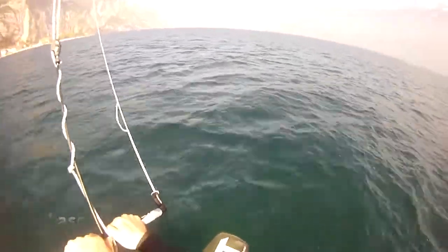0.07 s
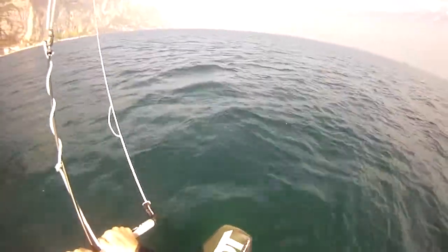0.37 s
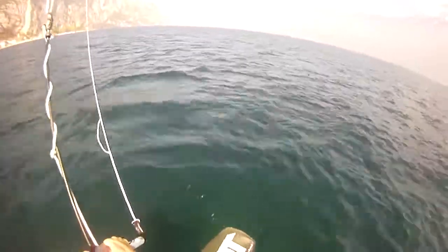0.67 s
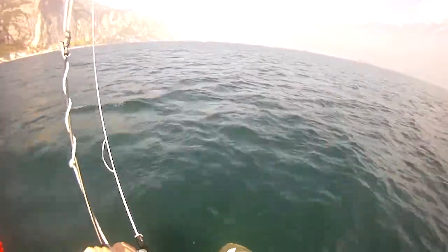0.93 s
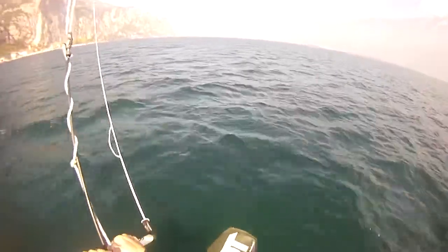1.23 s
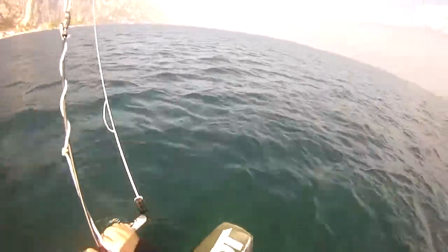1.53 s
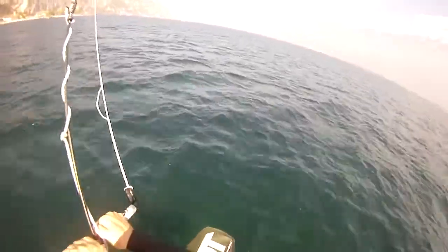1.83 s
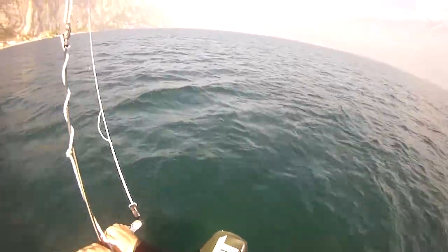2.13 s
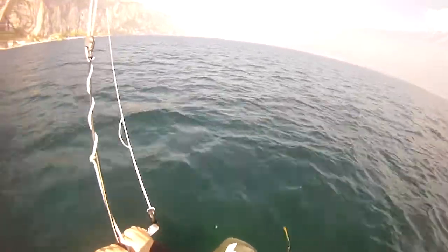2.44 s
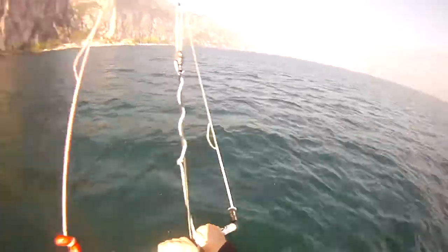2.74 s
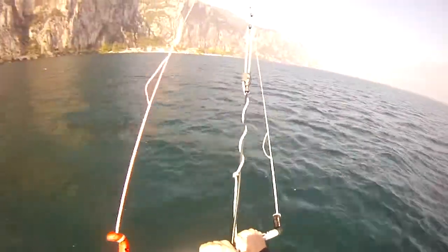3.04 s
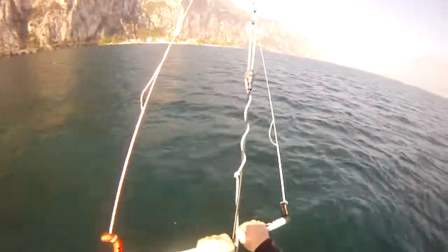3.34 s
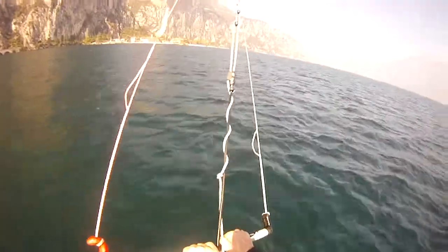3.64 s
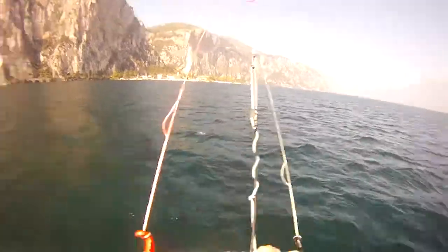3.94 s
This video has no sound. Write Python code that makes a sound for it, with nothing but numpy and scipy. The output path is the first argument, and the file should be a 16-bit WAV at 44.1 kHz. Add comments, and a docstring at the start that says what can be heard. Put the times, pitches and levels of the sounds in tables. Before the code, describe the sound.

A hollow, slightly glassy wind streams past a microphone out on a lake, carrying a thin unsteady whistle and light ticks. The wind suddenly eases and the whistle ends, while soft low buffets and muffled water continue.

```python
"""Kite camera over a lake

Wind streams past a small cased camera under a kite, ringing the hollows of the case and buffeting it.
A thin whistle, probably from an edge or a line, wavers until the camera swings round and the rush drops.
Faint ticks hit the case, water washes dully below, and something rustles briefly at the end.
The camera's low sample rate adds a glassy sheen."""
import sys
import numpy as np
from scipy import signal
from scipy.fft import rfft, irfft
from scipy.io import wavfile
from scipy.ndimage import map_coordinates

SR = 44100
rng = np.random.default_rng(int(sys.argv[2]) if len(sys.argv) > 2 else 0)


def unload_wav(signal):
    """Save mono or channel-first audio to the path in sys.argv[1] as 16-bit WAV at rate SR, clipped to [-1, 1]."""
    wavfile.write(
        sys.argv[1],
        SR,
        np.round(np.clip(np.atleast_2d(signal).T, -1, 1) * 32767).astype(np.int16),
    )


N = 176400

# Resonant hollows of the case: f/Hz, width/Hz, relative level facing the wind/dB, turned away/dB
HOLLOWS = [(568, 184, -17, -19.5), (1136, 315, -10.5, -6.5), (1644, 740, -13.5, -9),
           (1972, 267, -6.5, -3.5), (2140, 210, -0.46, -2), (2970, 150, -23.5, -28),
           (3555, 330, -23.5, -17.5)]


def rush():
    """Fluttering, eddying air rings the hollows; their balance shifts as the camera turns."""
    # Air flow over the case: t/s, level/dB
    flow = [(0, -45.3), (.17, -42), (.45, -43.7), (.63, -42.3), (.88, -44), (1, -43.5), (1.5, -44.4),
            (1.68, -41.7), (2, -45.2), (2.3, -45.9), (2.643, -43.8), (2.657, -51.8), (3, -51.6),
            (3.1, -48.5), (3.35, -49.6), (3.55, -53.2), (3.68, -50), (4, -51.3)]
    turn_s, turn_length_s = 2.65, 0.026
    flutter_db, flutter_hz, eddy_db, eddy_hz = 0.67, 22.44, 1.14, 167.7
    turned = np.clip((np.arange(N) / SR - turn_s) / turn_length_s + .5, 0, 1)
    gusts = undb(flutter_db * wander(flutter_hz) + eddy_db * wander(eddy_hz))
    out = 0
    for hz, width, facing_db, away_db in HOLLOWS:
        hollow = unit(ring(gusts * rng.standard_normal(N), hz, width))
        out += hollow * undb(facing_db + (away_db - facing_db) * turned)
    return out * undb(curve(flow))


def whistle():
    """Shed vortices sing one tone that breaks upward now and then and dies as the camera turns."""
    # Wavering main note: t/s, f/Hz, relative level/dB
    note = [(0, 1234, -41.5), (.15, 1220, -45.5), (.23, 1145, -50.5), (.35, 1202, -43), (.47, 1199, -43.5),
            (.51, 1292, -43), (.73, 1280, -44.5), (.78, 1183, -42), (.94, 1242, -45), (.99, 1201, -43.5),
            (1.19, 1192, -41.5), (1.31, 1248, -41), (1.43, 1272, -49), (1.53, 1200, -43), (1.69, 1245, -45),
            (1.76, 1170, -43.5), (1.95, 1143, -41), (2.0, 1087, -47.5), (2.07, 1181, -47),
            (2.19, 1114, -47), (2.3, 1140, -42.5), (2.41, 1113, -46), (2.5, 1219, -47), (2.58, 1126, -41.5),
            (2.63, 1081, -58)]
    # Breaks to a higher, weaker note: centre t/s, length/s, f/Hz, relative level/dB
    breaks = [(0.198, 0.041, 1280, -69), (1.109, 0.034, 1355, -50), (1.245, 0.084, 1390, -47.5),
              (1.819, 0.049, 1290, -48), (2.103, 0.053, 1295, -52), (2.377, 0.061, 1283, -50.5)]
    gain_db, crossfade_s, end_s, release_s = -3.77, 0.017, 2.63, 0.033
    t = np.arange(N) / SR
    out = vortex_tone(curve(note)) * undb(curve(note, column=2))
    for centre, length, hz, db in breaks:
        blend = np.clip((length / 2 - np.abs(t - centre)) / crossfade_s + .5, 0, 1)
        out = (1 - blend) * out + blend * vortex_tone(hz) * undb(db)
    release = np.clip(1 - (t - end_s) / release_s, 0, 1)
    return out * undb(gain_db) * release


def vortex_tone(hz):
    """The whistle's voice: a sine of rms 1, unsteady in pitch and level."""
    pitch_jitter, flutter_db = 0.0162, 1.5
    pitch = hz * (1 + pitch_jitter * wander(hz=140))
    phase = 2 * np.pi * np.cumsum(pitch) / SR
    return unit(np.sin(phase) * undb(flutter_db * wander(hz=90)))


def buffet():
    """Low gusts press on the case and make it rumble."""
    # Strength of the buffeting: t/s, relative level/dB
    strength = [(0, -51.5), (0.7, -52.5), (1.05, -53), (1.25, -50.5), (1.7, -55.9), (2.2, -53), (2.62, -52),
                (2.8, -51), (3.3, -49.5), (3.54, -49.5), (3.64, -51), (4.0, -48.5)]
    # Rumble spectrum: f/Hz, relative level/dB
    colour = [(12, -14), (25, -1.5), (45, 1), (62, 2), (90, -5.5), (120, -13), (150, -15), (175, -10),
              (205, -20), (300, -26.5), (420, -32.5), (800, -27), (2000, -64)]
    gain_db, gust_db = -0.5, 1.1
    return noise(colour) * undb(curve(strength) + gain_db + gust_db * wander(hz=7.1))


def thumps():
    """Large eddies each rock the air at the case for a few slow cycles."""
    # Heavy buffets: t/s, envelope peak/dB
    eddies = [(1.229, -44), (2.63, -43), (3.615, -37), (3.776, -42)]
    pitch_hz, rise_s = 50, 0.01
    out = 0
    for onset, db in eddies:
        age = np.maximum(np.arange(N) / SR - onset, 0)
        envelope = age / rise_s * np.exp(1 - age / rise_s)
        out += undb(db) * envelope * np.sin(2 * np.pi * pitch_hz * age)
    return out


def ticks():
    """Small, sharp hits ring the case near its strongest hollow."""
    # Hits on the case: t/s, peak level/dB
    hits = [(.155, -30), (.257, -33), (.634, -33), (.961, -33), (1.356, -34.5), (1.682, -39), (2.555, -53),
            (2.849, -41), (3.081, -35.5), (3.326, -44), (3.658, -36)]
    decay_s = 0.0024
    t = np.arange(SR // 20) / SR
    out = np.zeros(N)
    for onset, db in hits:
        burst = rng.standard_normal(len(t)) * np.exp(-t / decay_s)
        tick = ring(burst, hz=2055, width=340)
        start = int(onset * SR)
        out[start:start + len(t)] += tick / np.abs(tick).max() * undb(db)
    return out


def wash():
    """Choppy water and distant air, muffled by the case."""
    # Dull wash spectrum: f/Hz, relative level/dB
    colour = [(100, 11), (400, 3), (800, -3), (1400, 9), (2400, -1), (3200, -2), (4200, -11.5),
              (5600, -10.5)]
    level_db, flicker_db = -55.5, 1
    return noise(colour) * undb(level_db + flicker_db * wander(hz=24.93))


def patter():
    """Fine random taps, probably spray, ring all the hollows."""
    taps_per_s, level_db, spread_db = 39, -58.5, 2.5
    onsets = rng.random(N) < taps_per_s / SR
    taps = onsets * undb(spread_db * np.minimum(rng.exponential(size=N), 4))
    ringing = sum(undb(db) * ring(taps, hz, width) for hz, width, db, _ in HOLLOWS)
    return unit(ringing) * undb(level_db)


def rustle():
    """A brief, grainy brush near the case, perhaps a sleeve."""
    # Bright brushing spectrum: f/Hz, relative level/dB
    colour = [(1500, -25), (2800, -6), (3500, 9), (4200, -7), (5600, -6)]
    centre_s, half_width_s, level_db, grain_db = 3.965, 0.039, -61, 3.3
    swell = np.exp(-((np.arange(N) / SR - centre_s) / half_width_s) ** 2)
    return noise(colour) * swell * undb(level_db + grain_db * wander(hz=150))


def undb(db):
    """Decibels to gain."""
    return 10 ** (np.asarray(db) / 20)


def unit(x):
    """Scale to a standard deviation of 1."""
    return x / np.std(x)


def curve(table, column=1):
    """One column of a table, joined by straight lines in time."""
    rows = np.array(table)
    return np.interp(np.arange(N) / SR, rows[:, 0], rows[:, column])


def wander(hz):
    """Smooth random modulation through hz points a second, spread 1."""
    position = np.arange(N) / SR * hz
    return unit(map_coordinates(rng.standard_normal(8192), [position], order=2, mode="wrap"))


def noise(colour):
    """Noise of rms 1, its spectrum drawn through points of f/Hz, level/dB."""
    hz, db = np.array(colour).T
    f = np.arange(N // 2 + 1) * SR / N + 1e-3
    gain = undb(np.interp(np.log(f), np.log(hz), db))
    return unit(irfft(rfft(rng.standard_normal(N)) * gain, N))


def ring(x, hz, width):
    """A resonance applied twice for steep skirts; width is in Hz, for one pass."""
    b, a = signal.iirpeak(hz, hz / width, fs=SR)
    return signal.lfilter(b, a, signal.lfilter(b, a, x))


def scene():
    """All layers meet at the camera's one microphone."""
    return (rush() + whistle() + buffet() + thumps() + wash() + patter() + ticks() + rustle())[None]


def record(dry):
    """The camera samples slowly and holds each value, which mirrors the sound into the treble."""
    sample_hz, hold_count, input_top_hz, output_top_hz = 12000, 4, 5780, 15250
    input_lowpass = signal.butter(40, input_top_hz, fs=SR, output="sos")
    output_lowpass = signal.ellip(12, .1, 80, output_top_hz, fs=SR, output="sos")
    band = signal.sosfilt(input_lowpass, dry)
    sampled = signal.resample(band, N * sample_hz // SR, axis=1)
    held = np.repeat(sampled, hold_count, axis=1)
    return signal.sosfilt(output_lowpass, signal.resample(held, N, axis=1))


dry = scene()
out = record(dry)
unload_wav(out)
```